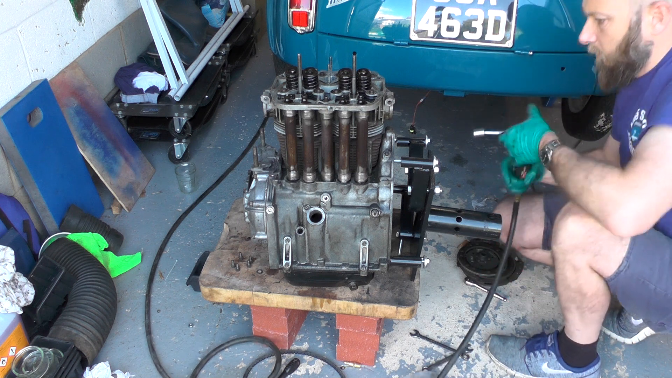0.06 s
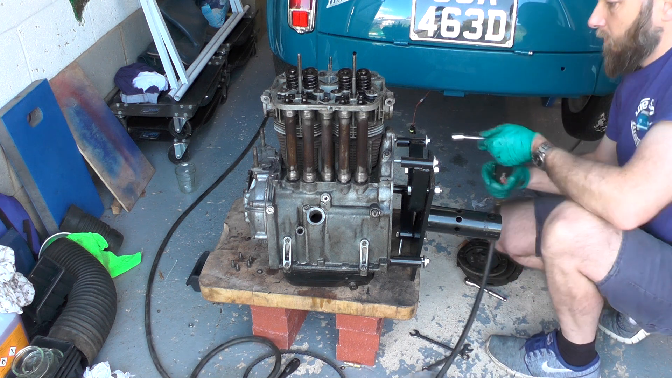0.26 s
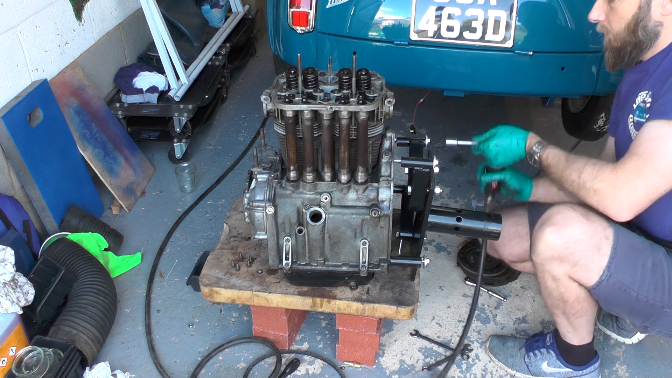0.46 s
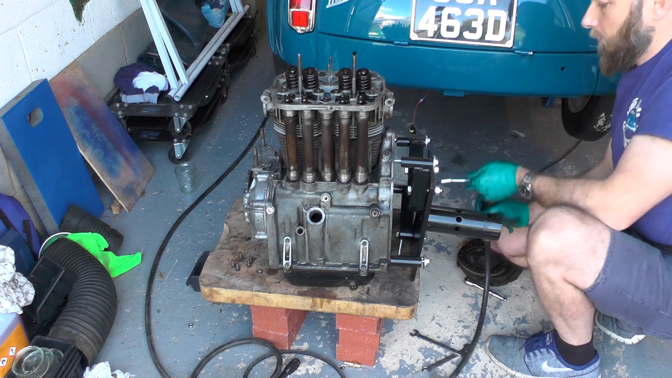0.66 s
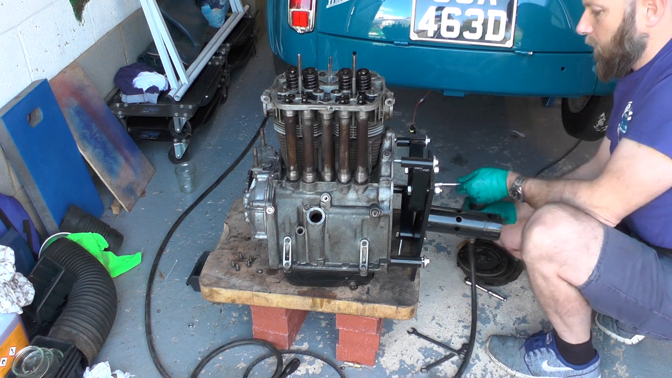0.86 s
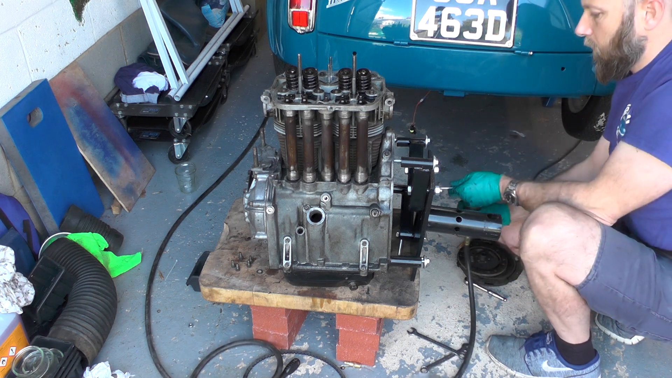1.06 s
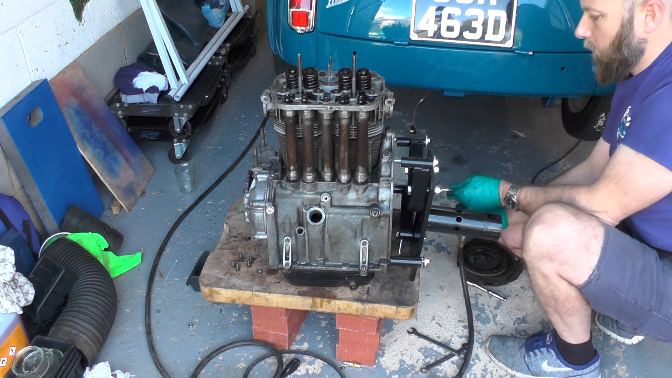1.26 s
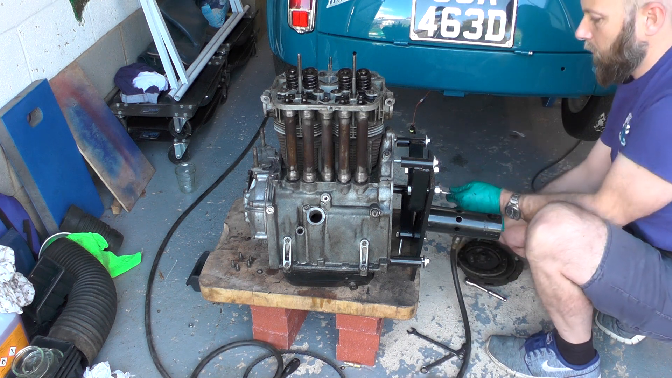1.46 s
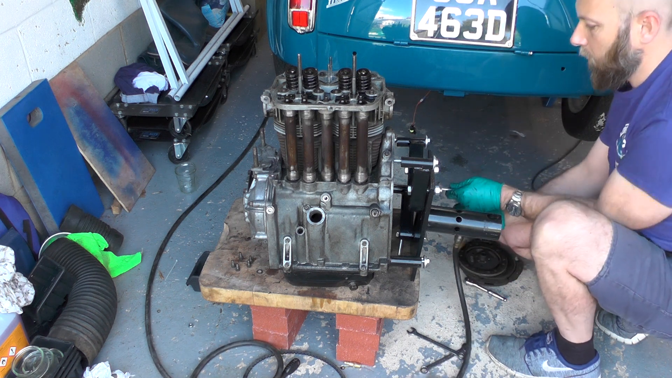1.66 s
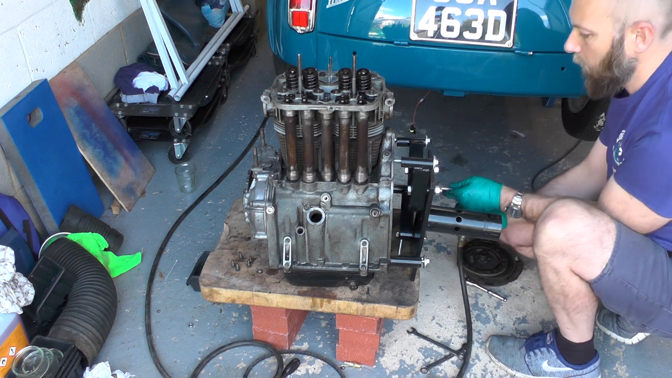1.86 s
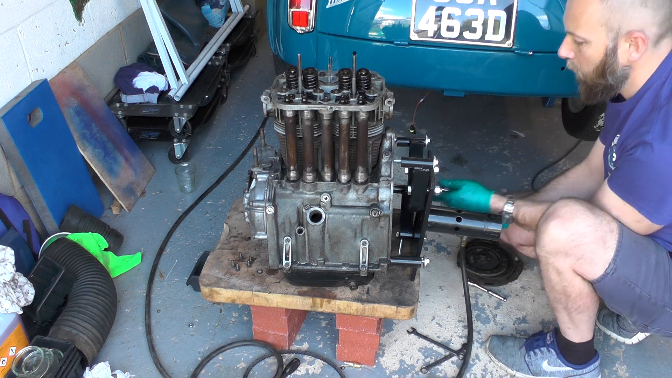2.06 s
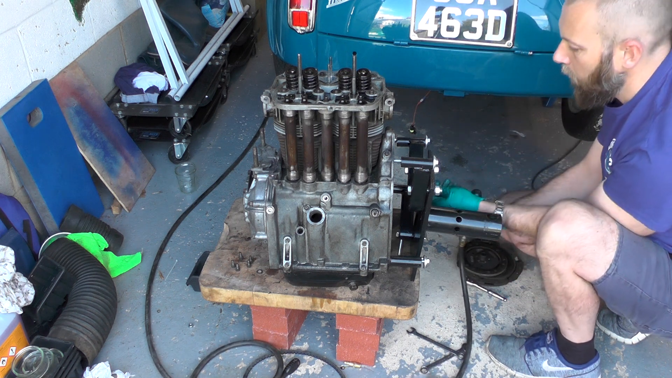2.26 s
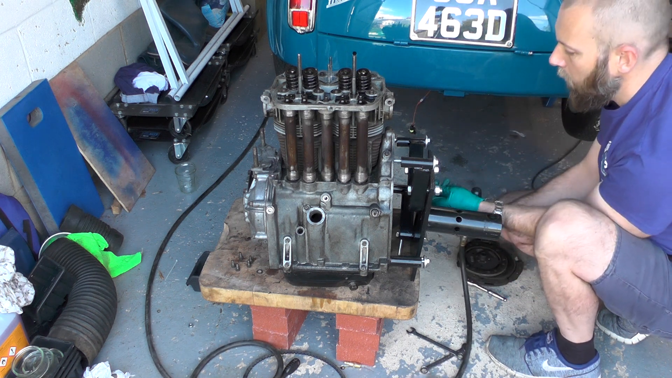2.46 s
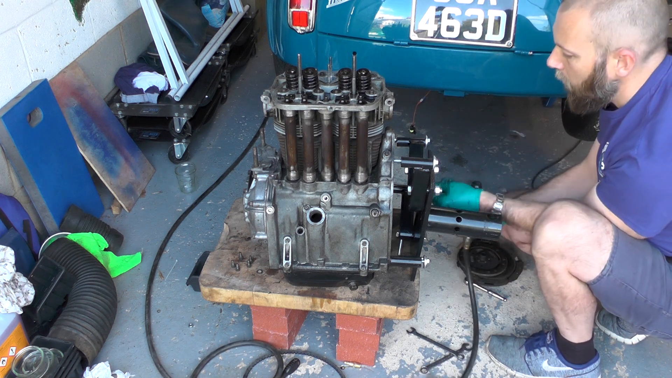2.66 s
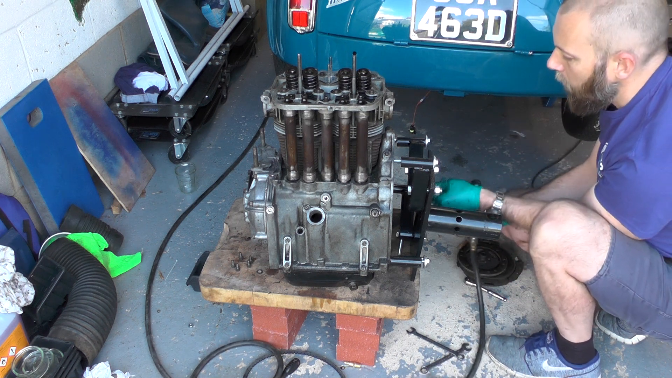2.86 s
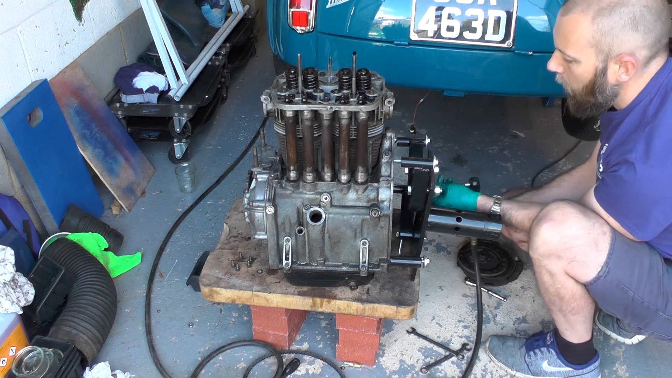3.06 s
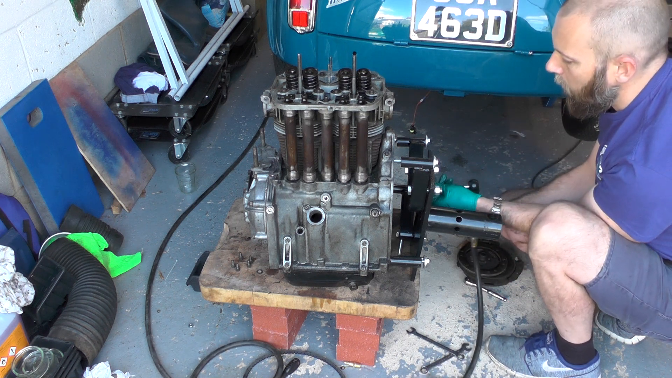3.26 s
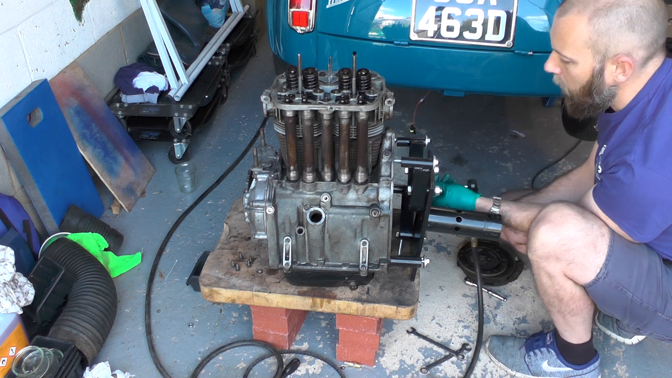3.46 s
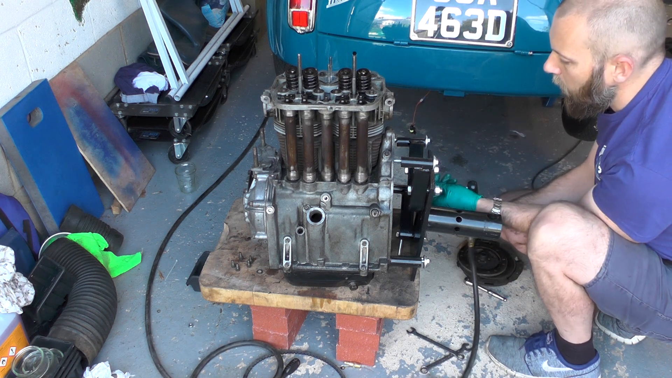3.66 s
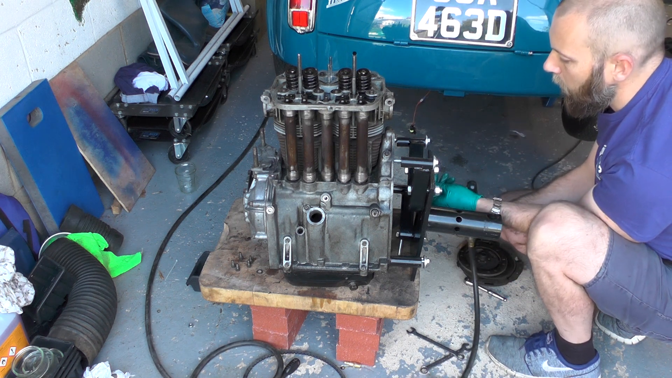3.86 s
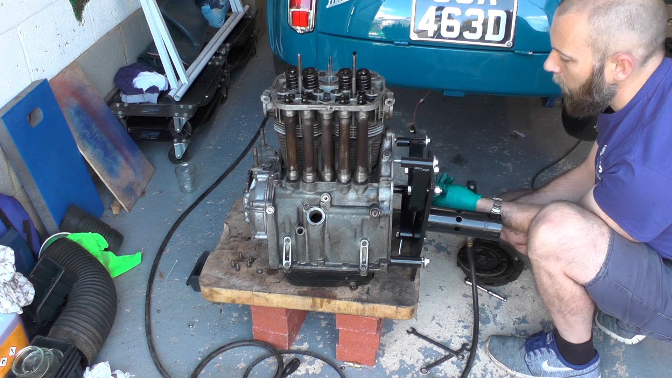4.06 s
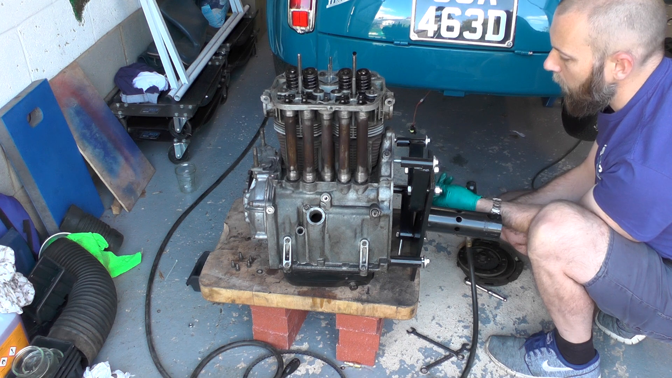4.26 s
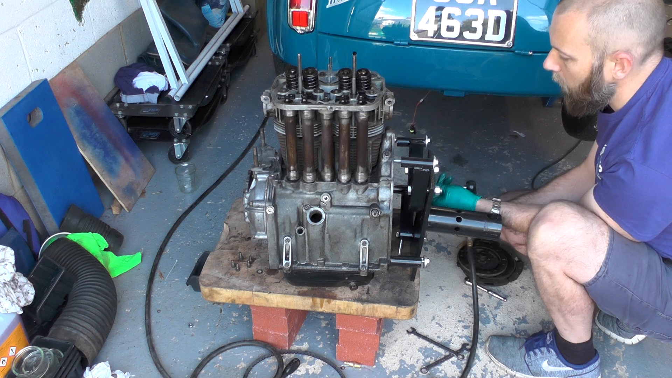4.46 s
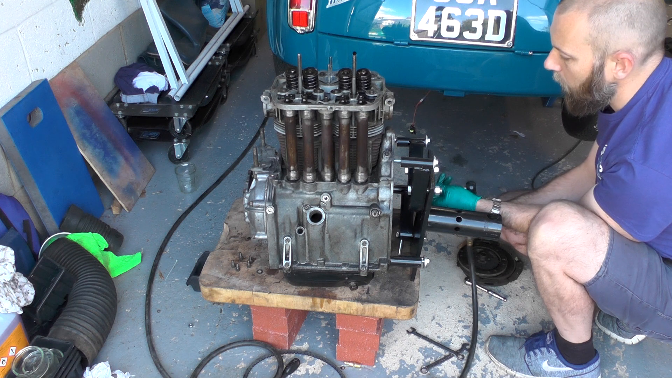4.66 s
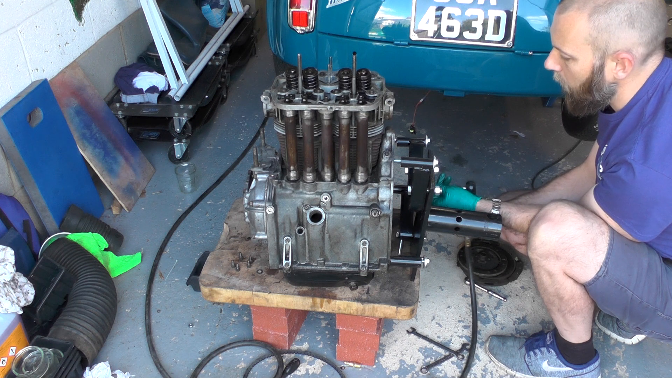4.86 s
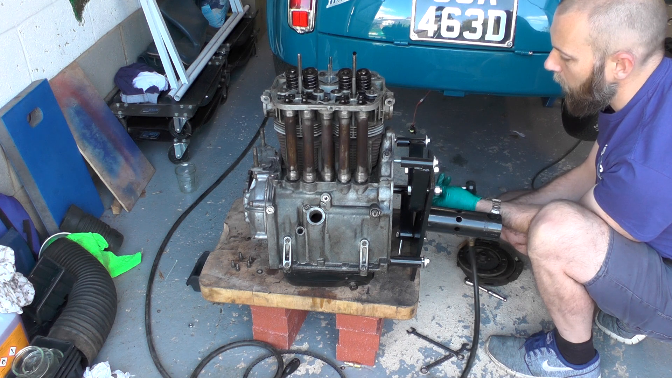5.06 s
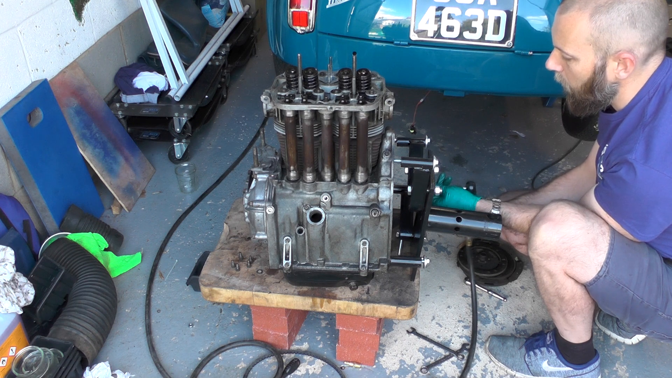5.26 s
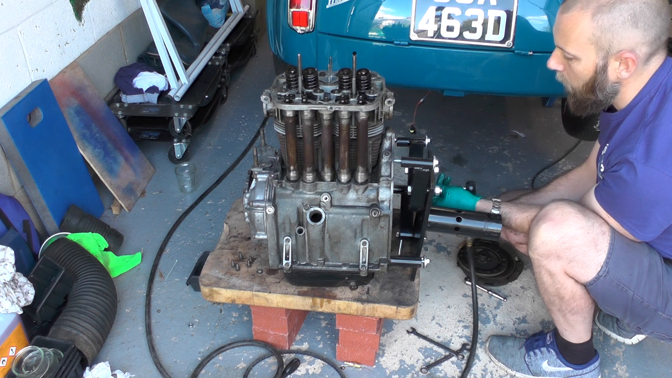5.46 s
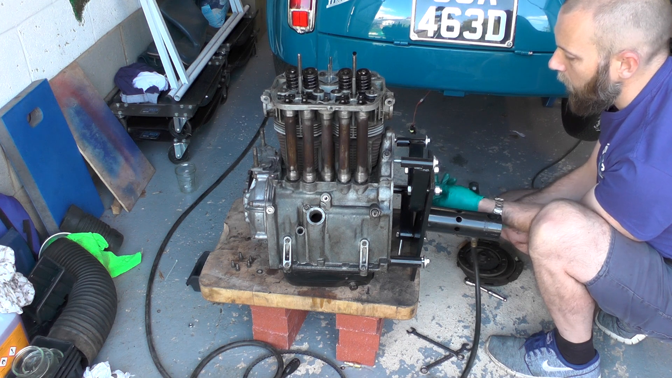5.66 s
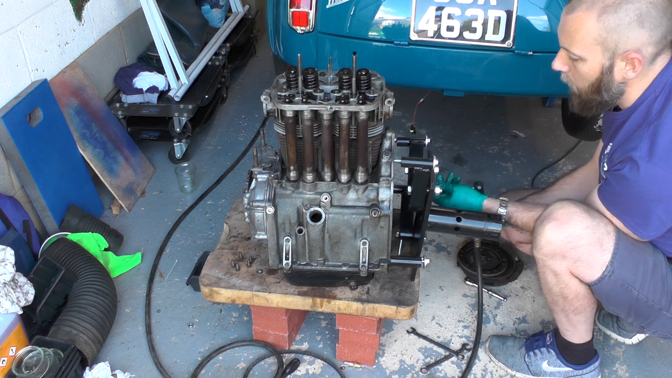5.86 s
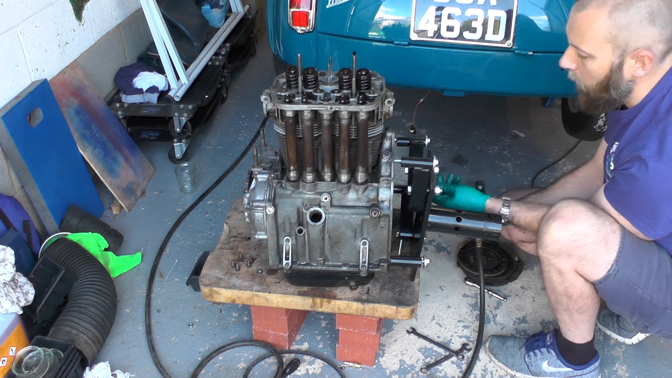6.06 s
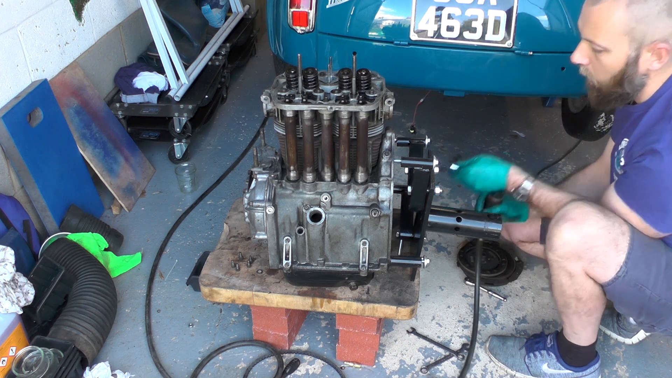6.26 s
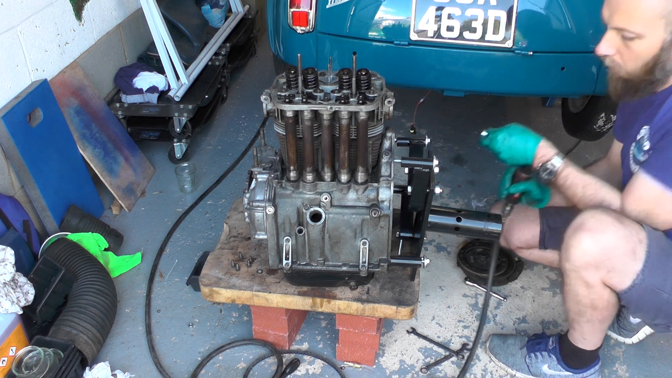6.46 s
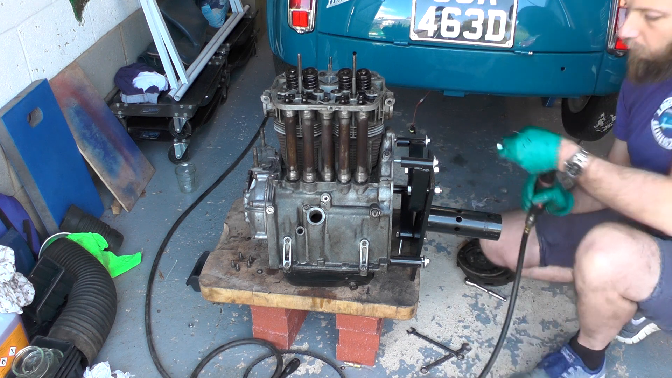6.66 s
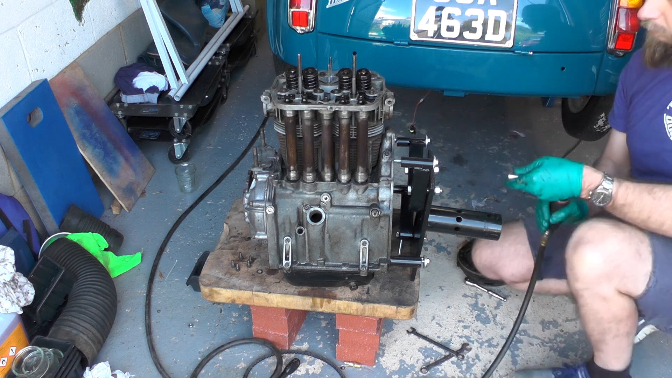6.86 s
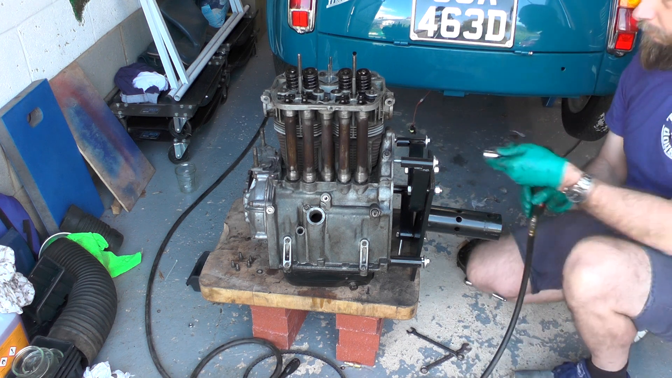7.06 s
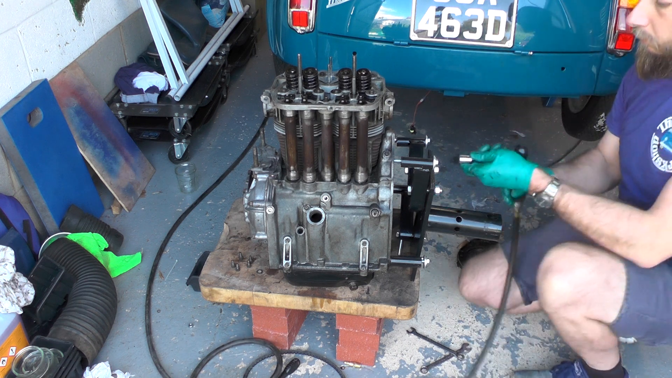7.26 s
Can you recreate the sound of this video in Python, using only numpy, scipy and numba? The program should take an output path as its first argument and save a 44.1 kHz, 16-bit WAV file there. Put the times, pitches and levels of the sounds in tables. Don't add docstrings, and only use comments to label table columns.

```python
import sys
import numpy as np
from scipy import signal
from scipy.fft import rfft, irfft
from scipy.io import wavfile
from scipy.ndimage import uniform_filter1d
from numba import njit

SR = 44100
rng = np.random.default_rng(int(sys.argv[2]) if len(sys.argv) > 2 else 0)


def gain_from_db(level_db):
    decades = np.asarray(level_db, float) / 20
    return 10 ** decades


def generate_wav(sig):
    pcm = np.round(np.clip(np.atleast_2d(sig).T, -1, 1) * 32767).astype(np.int16)
    wavfile.write(sys.argv[1], SR, pcm)


N = 321908
T = np.arange(N) / SR

# time_s, level_db
TRAFFIC = [(0, -44.5), (.5, -46.5), (1.0, -51), (1.6, -41), (2.0, -43), (2.6, -44.5), (3.2, -51.5),
           (5.5, -51.5), (7.3, -53)]
# freq_hz, density_db
TYRES = [(300, -14.5), (600, -5), (900, 1), (1150, -2.5), (1500, -12.5), (2500, -19), (5000, -26)]
# freq_hz, density_db
YARD = [(40, 3), (107, -7.5), (156, -11), (322, -16), (650, -19.5), (1030, -26), (1610, -24), (2600, -31),
        (4600, -33.5), (8500, -37.5), (10500, -46.5), (15800, -45)]
# freq_hz, level_db
HUM = [(100, -45.5), (200, -54.5), (300, -77.5)]
# middle_s, half_length_s, level_db
GUSTS = [(0, 0.2, -29.5), (0.524, 0.16, -36.5), (1.277, 0.28, -36.5), (1.813, 0.16, -45.5),
         (2.62, 0.056, -42), (4.342, 0.12, -43.5), (4.974, 0.079, -21), (5.76, 0.14, -45.5),
         (6.027, 0.15, -36), (6.382, 0.21, -27.5), (6.637, 0.093, -24.5), (6.99, 0.18, -18),
         (7.3, 0.071, -17.5)]
# freq_hz, density_db
WIND = [(8, 8.5), (22, 7.5), (45, -24.0), (70, -16.0), (150, -56.5)]
# middle_s, half_length_s, level_db, bright_part_db
SCUFFS = [(0.02, 0.035, -42.5, -5), (0.164, 0.082, -48.5, -12), (0.354, 0.067, -40.5, -7),
          (0.498, 0.031, -33, -13.5), (0.564, 0.018, -30, -7.5), (0.585, 0.025, -46, -25),
          (0.625, 0.033, -59, -22), (0.686, 0.036, -41, -7.5), (0.739, 0.02, -39.5, -11),
          (0.763, 0.023, -30, -4.5), (0.794, 0.02, -35, -3), (0.831, 0.017, -39, -12),
          (1.118, 0.025, -36, -15), (1.16, 0.011, -49, 2), (1.334, 0.022, -47, -11),
          (1.413, 0.054, -40, -11.5), (2.175, 0.11, -48.5, -18), (2.25, 0.022, -60, -2),
          (2.367, 0.028, -48, -27), (2.676, 0.043, -46.5, -4), (2.875, 0.037, -44.5, -6.5),
          (3.254, 0.061, -50.5, -15), (5.75, 0.013, -52, -31), (6.383, 0.4, -53, -9),
          (6.57, 0.058, -39.5, -10), (6.65, 0.031, -28, -4.5), (6.704, 0.056, -33, -9),
          (6.83, 0.033, -29.5, -8.5), (6.878, 0.029, -29, -6), (6.913, 0.021, -33.5, -5.5),
          (7.054, 0.18, -49, -11), (7.22, 0.029, -44.5, -3), (7.29, 0.017, -57, -3)]
# freq_hz, density_db
SCUFF_LOW = [(120, -21), (300, -6), (680, -6.5), (1240, -3.5), (1800, -4.5), (3000, -6), (4500, -7.5),
             (6000, -15), (7800, -37)]
# freq_hz, density_db
SCUFF_TOP = [(2940, -35), (5000, -26), (6390, -11), (8330, -5.5), (10700, -21.5), (13300, -17.5),
             (15800, -28)]
# time_s, pitch_hz, level_db
SQUEAK = [(2.04, 12400, -85), (2.07, 13500, -65), (2.11, 15100, -66), (2.16, 15900, -76),
          (2.28, 15300, -78), (2.31, 15000, -69), (2.4, 14300, -73), (2.47, 12900, -59), (2.51, 11900, -71),
          (2.62, 11700, -69), (2.65, 11800, -92)]
# middle_s, half_length_s, pitch_hz, level_db
RUBS = [
    (2.3, .17, 3600, -60),
    (2.33, .12, 4050, -64),
    (2.2, .14, 13000, -69),
    (2.33, .03, 13100, -66),
    (2.34, .05, 11200, -72),
    (2.4, .06, 12000, -72),
    (3.26, .04, 3600, -60),
]
# start_s, peak_db, ring_hz
CLACKS = [(0.1233, -23.5, 690), (0.474, -5, 2300), (0.4743, -7, 1080), (0.5285, -9.5, 1840),
          (.595, -10.5, 1760), (1.081, -8.5, 2620), (1.09, -17, 3020), (1.1004, -9, 1720),
          (1.111, -27, 2440), (2.1274, -27, 900), (2.15, -23, 1650), (2.155, -33, 2780), (2.172, -27, 2000),
          (2.1857, -28, 745), (2.189, -30, 2400), (2.354, -20.5, 670), (2.829, -26, 1500),
          (2.8607, -31, 2230), (2.845, -27.5, 1770), (2.92, -27.5, 690), (6.604, -11.5, 3660),
          (6.674, -8.5, 1020), (6.726, -4.5, 1200), (6.768, -6.5, 670)]
# start_s, peak_db, ring_hz
KNOCKS = [(0.0123, -17.5, 2250), (.548, -34, 2400), (0.559, -14, 1800), (.5743, -36, 2300),
          (.6549, -14, 1840), (0.677, -26, 2500), (.725, -26, 1810), (.744, -23, 1100), (1.6084, -28, 905),
          (2.653, -28, 1880), (2.675, -27.5, 950), (2.6917, -19, 1700), (2.711, -25, 1610),
          (2.889, -22, 1620), (6.189, -41, 1606), (6.559, -19.5, 3220), (6.597, -31, 2500),
          (6.63, -17.5, 1100), (6.72, -24, 2000), (6.69, -16.5, 2000), (6.751, -17, 1600),
          (6.825, -16.5, 3210), (6.839, -5.5, 1010), (6.877, -31, 1400), (6.993, -29.5, 438),
          (7.241, -19, 3080), (7.282, -17, 1050)]
# start_s, peak_db, ring_hz
TICKS = [(0.285, -31.5, 920), (0.344, -28, 1110), (0.8212, -26.5, 750), (1.151, -37, 2440),
         (1.1844, -36, 2000), (1.2404, -26, 1800), (1.27, -30.5, 1500), (1.3488, -30, 1610),
         (1.3987, -25.5, 915), (2.4654, -42, 890), (2.7543, -34, 1040), (7.089, -35.5, 780),
         (7.19, -35, 1710), (7.215, -26, 3410)]
# bright_part_db, t60_s
CONTACT = [
    (-38.5, 0.089),
    (-14.5, 0.077),
    (-3.5, 0.1),
]
# start_s, level_db, pitch_hz, t60_s
TINKLES = [(.685, -47, 12500, 0.17), (.69, -42, 6060, 0.074), (.69, -47, 5200, .05), (.69, -47, 9300, 0.12),
           (.85, -52, 13000, 0.25), (.86, -54, 9140, 0.4), (.86, -59, 11400, .2), (1.355, -62, 12700, .1),
           (2.343, -60, 9300, .05), (2.345, -59, 13100, .05), (2.35, -66, 12000, .07),
           (2.462, -57, 9200, .05), (2.465, -59, 11400, .04), (2.464, -61, 15200, .04),
           (2.545, -65, 13700, .15), (2.628, -60, 9100, .08), (2.63, -58, 8100, .1),
           (2.63, -58, 12900, .06), (0.477, -25, 1770, 0.054), (0.475, -22, 1048, 0.044),
           (0.474, -18, 3310, 0.032), (1.103, -21, 1740, 0.025), (6.727, -8.5, 1690, 0.017),
           (7.09, -53, 4650, 0.15)]
# start_s, level_db, pitch_hz
THUDS = [(0.476, -46, 420), (.529, -30, 563), (0.562, -35, 345), (0.595, -30, 234), (.597, -30.5, 404),
         (.606, -33, 620), (1.089, -33, 189), (1.401, -40, 295), (1.608, -33, 217), (2.357, -34, 520),
         (6.677, -20, 129), (6.678, -34, 537), (6.728, -24.5, 394), (6.767, -24, 332), (6.771, -32, 209),
         (6.841, -29, 600), (6.994, -31, 252)]
# start_s, level_db, centre_hz, fade_s
BOUNCES = [(0.4776, -13, 3420, 0.0019), (0.476, -14, 1810, .003), (.484, -27, 3900, .004),
           (.489, -23, 1090, .005), (.499, -29, 2600, .002), (.5315, -29, 2800, .003),
           (.549, -32, 2300, .002), (0.56, -24, 3260, .003), (.565, -20, 1800, 0.0036),
           (0.574, -25, 4500, .003), (0.596, -25, 1900, 0.0043), (0.658, -28, 1870, 0.0028),
           (.674, -35, 2800, .002), (.754, -27, 1280, .004), (1.0812, -24, 7600, .003),
           (1.083, -24, 2450, .003), (1.085, -23, 5640, 0.0049), (1.0915, -27, 2300, .003),
           (1.097, -26, 2800, .003), (1.1035, -27, 2900, .003), (1.109, -24, 1890, 0.0024),
           (1.113, -26, 3000, 0.0072), (1.128, -34, 1750, .01), (1.15, -28, 7900, .002),
           (1.183, -37, 7600, 0.0023), (2.653, -34, 2540, .003), (2.692, -42, 2210, 0.0023),
           (6.558, -33, 3340, .002), (6.6027, -20, 3100, 0.00073), (6.632, -29, 3500, .003),
           (6.664, -32, 3600, .01), (6.689, -28, 2800, .002), (6.702, -25, 2800, .003),
           (6.74, -32, 1700, .004), (6.773, -19, 1700, .004), (6.79, -29, 1700, .006),
           (6.824, -22, 3300, 0.00073), (6.848, -25, 1000, 0.0046), (6.877, -24, 3320, .0008),
           (6.89, -28, 1300, .01), (7.242, -45, 3000, 0.0028), (0.4744, -9, 3100, 0.0012),
           (0.4736, -15.5, 917, .002), (.492, -23, 1050, 0.0047), (0.482, -22, 3300, .004),
           (0.5967, -25, 890, 0.0034), (1.086, -27, 3600, 0.0045), (1.104, -22.5, 2500, .004),
           (6.6745, -13, 800, 0.0018), (6.731, -20, 1720, .008), (6.7276, -20, 1100, 0.0011),
           (6.7288, -21, 2200, 0.00085), (6.753, -23, 1680, .003), (6.8416, -16, 2300, .001),
           (.6555, -20, 1810, .003)]

# open_s, shut_s, pop_db, air_db, free_vane_rate_hz
PULLS = [
    (3.331, 3.5, -10, -20, 1498),
    (3.68, 4.226, -9, -21.5, 1491),
    (4.356, 4.534, -9.5, -20.5, 1491),
    (4.619, 4.771, -12, -20.5, 1490),
    (5.009, 5.158, -9.5, -20.5, 1503),
    (5.316, 5.437, -10, -20.5, 1496),
]
OPEN_S = [0.0031, 0.0079, 0.0098, 0.0097, 0.0093, 0.0087]
LAG_S = [.001, 0.00105, 0.00101, 0.000994, .004, 0.00194]
SHUT_MORE_DB = [-1, -8, 3, 2, 2, -1.5]
# held_s, vane_rate_lost_hz
SAG = [(.085, 0), (.16, 30), (.28, 68), (.48, 82), (0.542, 99.5)]
# vane_rate_lost_hz, first_db, second_db, third_db
TONES = [(0, -23.5, -18, -22.5), (12, -19.5, -15, -23), (27, -17, -20, -23), (50, -22, -16.5, -23.5),
         (64, -18.5, -25.5, -28.5), (77.5, -15.5, -26.5, -20.5), (97, -16, -19, -25.5)]
# multiple, level_db
UPPER = [(4, -14.5), (5, -5.5), (6, -25), (7, -46), (8, -24.5)]
# vane_rate_hz, fourth_db, fifth_and_up_db
FAVOUR = [(1390, -15, -15.5), (1420, 0, 4.5), (1450, 4.5, 2.5), (1500, 4, 2.5), (1470, -6.5, -5),
          (1502, -5, -4.5), (1505, -2, -9)]
RISE = [5.2, 2.6, 4.9, 5.9, 7, 8.5, 9]
# freq_hz, level_db
MUFFLER = [(120, -38), (260, -26), (480, -31), (650, -17.5), (800, -14.5), (1000, -15), (1160, -29),
           (1320, -15), (1450, -19)]
# vane_rate_hz, level_db
COAST_FADE = [(430, -31), (580, -11.5), (720, -3.5), (800, 2.5)]
# freq_hz, density_db
AIR = [(150, -24.5), (380, -14.5), (750, -13.5), (1200, -2.5), (1800, 1.5), (2600, -4.5), (3500, 2),
       (4800, 2), (6100, -3.5), (7500, 8), (8500, 2.5), (10200, -7.5), (12000, -6.5), (15800, -9.5)]
# freq_hz, density_db
POP = [(35, -42.5), (60, -23.5), (130, -21.5), (240, -4.5), (420, -19.5), (799, -4), (1220, -11.5),
       (1650, -4.5), (2500, -9.5), (3310, -5.5), (4920, -17), (5930, -22), (6990, -3.5), (10100, -21.5),
       (15800, -22)]
# centre_hz, width_hz, level_db
CASING = [(790, 490, 7.5), (1650, 44, 11.5), (2300, 68, -1), (3475, 130, -0.5), (4740, 200, 12.5),
          (6950, 370, -14.5), (8100, 230, -3.5)]
# freq_hz, density_db
CHUFF = [(150, -26), (300, -20.5), (480, -15.5), (750, -2), (1100, 2), (1900, -6.5), (2600, -12),
         (4000, -14.5), (8000, -17.5)]
# multiple, level_db, t60_s
LINGER = [(1, -24.5, 0.53), (2, -31.5, 0.53), (3, -29, 0.49), (4, -42, .35), (5, -36.5, 0.48)]
# delay_s, level_db
ECHOES = [
    (.011, -23.5),
    (0.028, -16.5),
    (.041, -27),
    (0.065, -45.5),
]
# pitch_hz, level_db, t60_s
STAND = [(1488, -19, 1.2), (1438, -8.5, 7), (1446, -25, 5), (2350, -4.5, 2.5)]
# pitch_hz, level_db, t60_s
BLOCK = [(1435, -9, 0.24), (1530, -28.5, 0.89), (4460, 1, 0.44), (4320, -3.5, 0.68), (4468, -12.5, 0.15),
         (3120, -9.5, .4), (2810, -16.5, 0.3), (4200, -7, .4), (7500, -8, 0.38)]

DUCK_DB, RECOVER_S = -16.5, 0.48
ROOM_T60_S, ROOM_DAMP, ROOM_DB, TOOL_ROOM_DB = 0.4, 0.017, -19.5, -1.5


def unit(x):
    return x / np.sqrt(np.mean(x ** 2))


def curve(rows):
    s, *columns = np.transpose(rows)
    return [np.interp(T, s, c) for c in columns]


def lookup(x, rows):
    return np.interp(x, *np.transpose(rows))


def coloured(points):
    hz, db = np.transpose(points)
    f = np.maximum(np.fft.rfftfreq(N, 1 / SR), 1)
    gain = gain_from_db(np.interp(np.log(f), np.log(hz), db, -80, -80))
    return unit(irfft(rfft(rng.standard_normal(N)) * gain, N))


def band(x, hz, width):
    return signal.lfilter(*signal.iirpeak(min(hz, 20000), hz / width, fs=SR), x)


def walk(rate):
    k = int(SR / rate)
    steps = np.repeat(rng.standard_normal(N // k + 1), k)
    return unit(uniform_filter1d(uniform_filter1d(steps, k), k)[:N])


def swell(middle, half, power=2):
    return np.exp(-((T - middle) / half) ** power)


def place(out, s, sound):
    i = int(s * SR)
    out[i:i + len(sound)] += sound


@njit
def follow(x, up, down):
    y, e = np.empty(len(x)), 0.
    for i in range(len(x)):
        e += (x[i] - e) * (up if x[i] > e else down)
        y[i] = e
    return y


@njit
def walls(x, lags, gain, damp):
    line, soft, out = np.zeros((8, 4096)), np.zeros(8), np.zeros(len(x))
    for i in range(len(x)):
        total = 0.
        for k in range(8):
            soft[k] += (1 - damp) * (gain[k] * line[k, (i - lags[k]) & 4095] - soft[k])
            total += soft[k]
            out[i] += soft[k] * (1 - 2 * (k % 2))
        for k in range(8):
            line[k, i & 4095] = x[i] + soft[k] - total / 4
    return out


def held(on, off):
    return 1. * ((T >= on) & (T < off))


def valve():
    return sum(held(on, off) for on, off, *_ in PULLS)


def duck():
    return DUCK_DB * follow(valve(), 1 / (.01 * SR), 1 / (RECOVER_S * SR))


def background():
    traffic = gain_from_db(curve(TRAFFIC)[0] + 0.55 * walk(10)) * coloured(TYRES)
    yard = gain_from_db(-46.5 + 2.4 * walk(3.1)) * coloured(YARD)
    white = rng.standard_normal(N)
    hum = sum(gain_from_db(db) * (np.sin(2 * np.pi * hz * T) + 0.48 * unit(band(white, hz, 30.0))) for hz, db in HUM)
    gust = gain_from_db(-60) + sum(gain_from_db(db) * swell(s, half) for s, half, db in GUSTS)
    wind = gust * gain_from_db(0.21 * walk(30)) * coloured(WIND)
    return gain_from_db(duck()) * (traffic + yard + hum) + wind


def scuffs():
    low, top = coloured(SCUFF_LOW), coloured(SCUFF_TOP)
    out = sum(gain_from_db(db) * swell(s, half) * (low + gain_from_db(bright_db) * top) for s, half, db, bright_db in SCUFFS)
    return out * unit(gain_from_db(2.5 * walk(400) + 1.2 * walk(60)))


def squeak():
    hz, db = curve(SQUEAK)
    turn = 2 * np.pi * np.cumsum(hz * (1 + 0.0036 * walk(300))) / SR
    out = gain_from_db(db + 5.5 * walk(40)) * np.sin(turn)
    for s, half, rub_hz, rub_db in RUBS:
        rub = unit(band(band(rng.standard_normal(N), rub_hz, 220), rub_hz, 220))
        out += gain_from_db(rub_db + 4.0 * walk(50)) * swell(s, half, 4) * rub
    return out


def knock(t, hz, bright_db, t60):
    noise = rng.standard_normal((2, len(t)))
    fade = gain_from_db(-60 * t / t60)
    blow = noise[0] * (np.exp(-t / 0.0016) + 0.45 * fade)
    rings = band(blow, hz, 0.17 * hz)
    rings += 0.22 * band(blow, 1.28 * hz, .5 * hz) + 0.35 * band(blow, 0.8 * hz, 0.64 * hz)
    body = band(rings, 1.18 * hz, 3.1 * hz)
    top = band(band(noise[1], 5600, 5100), 9500, 14200) * (np.exp(-t / 0.00044) + 0.19 * fade)
    return body / np.abs(body).max() + gain_from_db(bright_db + 7.5) * top / np.abs(top).max()


def knocks():
    out = np.zeros(N + SR)
    t = T[:SR // 6]
    for rows, (bright_db, t60) in zip((CLACKS, KNOCKS, TICKS), CONTACT):
        for s, db, hz in rows:
            place(out, s, gain_from_db(db - 3.5) * knock(t, hz, bright_db, t60))
    for s, db, hz, t60 in TINKLES:
        beat = 1 + 1.1 * np.sin(2 * np.pi * 0.0052 * hz * t)
        place(out, s, gain_from_db(db - 60 * t / t60) * np.sin(2 * np.pi * hz * t) * beat)
    for s, db, hz in THUDS:
        place(out, s, gain_from_db(db - 60 * t / 0.07) * np.sin(2 * np.pi * hz * t))
    return out[:N]


def bounces():
    out = np.zeros(N + SR)
    t = T[:SR // 10]
    for s, db, hz, fade_s in BOUNCES:
        grains = rng.standard_normal(len(t)) * (1 - np.exp(-t / .0003)) * np.exp(-t / fade_s)
        burst = band(band(grains, hz, .33 * hz), hz, .66 * hz)
        place(out, s, gain_from_db(db + 1) * burst / np.abs(burst).max())
    return out[:N]


def linger():
    next_off = [p[1] for p in PULLS[1:]] + [T[-1] + 1]
    held_hz = 0
    for (on, off, _, _, free_hz), later in zip(PULLS, next_off):
        held_hz = held_hz + (free_hz - lookup(off - on, SAG) - 8) * held(off, later)
    age = T - np.maximum.accumulate(np.where(valve() > 0, T, -100.))
    turn = 2 * np.pi * np.cumsum(held_hz) / SR
    tones = sum(gain_from_db(db - 60 * age / t60 + 2 * walk(70)) * np.sin(multiple * turn + 1.9 * walk(60))
                for multiple, db, t60 in LINGER)
    return (1 - np.exp(-age / .015)) * tones


def rotor():
    spin_up_s, spin_down_s, brake_s, brake_share = .029, 0.059, .012, .45
    driven = sum(np.tanh(np.maximum(T - on - lag, 0) / spin_up_s + 0.11) * held(on, off)
                 for (on, off, *_), lag in zip(PULLS, LAG_S))
    speed = brake_share * follow(driven, .94, 1 / (brake_s * SR))
    speed += (1 - brake_share) * follow(driven, 0.97, 1 / (spin_down_s * SR))
    pressure = follow(valve(), 1 / (.002 * SR), 1 / (.006 * SR))
    return speed, pressure


def motor_top():
    pull = np.maximum(np.searchsorted([p[0] for p in PULLS], T) - 1, 0)
    on, off, _, _, free_hz = np.transpose(PULLS)[:, pull]
    lost = np.interp(np.minimum(T, off) - on, *np.transpose(SAG))
    ease = np.exp(np.minimum(T - off, 0) / .012)
    top_hz = free_hz - lost - 30 * ease
    flutter_db = 5.5 * np.exp(-np.abs(T - on) / 0.11)
    below, *columns = np.transpose(TONES)
    levels_db = []
    for k, column in enumerate(columns):
        level = np.interp(lost, below, column) + (.5 + flutter_db / (1 + k)) * walk(90)
        levels_db.append(level - 8 * ease * min(k, 1))
    rate, fourth_db, fifth_db = np.transpose(FAVOUR)
    for multiple, db in UPPER:
        lift_db = np.interp(top_hz, rate, fourth_db if multiple == 4 else fifth_db)
        levels_db.append(levels_db[2] + db + lift_db)
    return top_hz, levels_db


def vane_whine(speed, pressure):
    top_hz, levels_db = motor_top()
    slip, shut = 1 - speed, 1 - pressure
    rough = 0.0019 + .05 * slip * pressure + .012 * shut
    vane_hz = top_hz * speed * (1 + rough * walk(500))
    turn = 2 * np.pi * np.cumsum(vane_hz) / SR
    sweep_db = 2 * pressure + lookup(vane_hz, MUFFLER) + 2.5 * np.sqrt(slip) * walk(250)
    sweep_db += shut * (walk(300) + 20 * (speed - .7) + lookup(vane_hz, COAST_FADE) - 30 * speed ** 4)
    settled = np.clip(14 * speed - 12.8, 0, 1) * pressure
    whine = gain_from_db(settled * levels_db[0] + (1 - settled) * sweep_db) * np.sin(turn)
    whine += gain_from_db(-52.5 + 1.4 * walk(92)) * settled * np.sin(turn / 2 + 2.0 * walk(110))
    coast = shut * np.clip(speed - .25, 0, .35)
    blur = 1.2 * shut + 2.2 * slip * pressure
    for k, db in enumerate(levels_db[1:]):
        level = gain_from_db(db + 6 * np.sqrt(slip) * walk(250))
        level *= pressure * speed ** RISE[k] + 4.1 * coast / (1 + k)
        whine += level * np.sin((k + 2) * turn - 1.0 * k + blur * walk(900))
    return np.sqrt(2) * whine, turn


def valve_air(speed, pressure, turn):
    hiss = coloured(AIR) * (1 + 0.097 * np.sin(turn)) * (1 + 0.11 * np.sin(turn / 5))
    rush = coloured(POP)
    casing = unit(sum(gain_from_db(db) * band(rush, hz, width) for hz, width, db in CASING))
    rush = unit(rush + gain_from_db(-1.0) * casing)
    out = gain_from_db(-26) * coloured(CHUFF) * 4 * (1 - pressure) * speed * (1 - speed)
    step_db = 0.81 * duck()
    for (on, off, pop_db, air_db, _), open_s, more_db in zip(PULLS, OPEN_S, SHUT_MORE_DB):
        age = np.maximum(T - on, 0)
        opening = 1 - np.exp(-(age / open_s) ** 2)
        out += gain_from_db(pop_db) * rush * opening * (np.exp(-(age / 0.023) ** 2) + 1.11 * np.exp(-age / 0.0096))
        out -= gain_from_db(pop_db - 6 + step_db[int(on * SR)]) * age / .001 * np.exp(1 - age / .001)
        kick = age / 0.0011
        out += gain_from_db(pop_db - 13.5) * kick * (1 - kick / 2) * np.exp(1 - kick)
        shut = np.maximum(T - off, 0) / 0.003
        out += gain_from_db(-37 + more_db) * shut * np.exp(1 - shut)
        out += gain_from_db(air_db) * hiss * opening * (T < off + .1) * (0.44 * pressure + 0.28 * speed)
    return out


def wrench():
    speed, pressure = rotor()
    whine, turn = vane_whine(speed, pressure)
    return whine + valve_air(speed, pressure, turn)


def ring_along(tool, rows):
    return sum(gain_from_db(db) * band(tool, hz, np.log(1000) / np.pi / t60) for hz, db, t60 in rows)


def garage(x):
    lags = rng.integers(300, 2200, 8)
    high = signal.sosfilt(signal.butter(2, 250, "high", fs=SR, output="sos"), x)
    return walls(high + 1e-18, lags, gain_from_db(-60 * lags / SR / ROOM_T60_S), ROOM_DAMP)


def scene():
    tool = wrench()
    tool = tool + sum(gain_from_db(db) * np.roll(tool, int(s * SR)) for s, db in ECHOES)
    near = tool + knocks() + scuffs() + squeak()
    room = gain_from_db(ROOM_DB) * garage(near + (gain_from_db(TOOL_ROOM_DB) - 1) * tool)
    stand = gain_from_db(0.72 * (duck() - DUCK_DB) + 1.6 * walk(25)) * ring_along(tool, STAND)
    mix = near + bounces() + linger() + room + ring_along(tool, BLOCK) + stand + background()
    return mix[None, :]


def roll_off(x):
    return signal.sosfilt(signal.butter(12, 16640, fs=SR, output="sos"), x)


def record(dry):
    limited = np.tanh(dry / 1.349) * 1.272
    treble_limit = signal.ellip(10, .1, 70, 16000, fs=SR, output="sos")
    mix = signal.sosfilt(treble_limit, limited)
    return roll_off(mix)


dry = scene()
out = record(dry)
generate_wav(out)
```